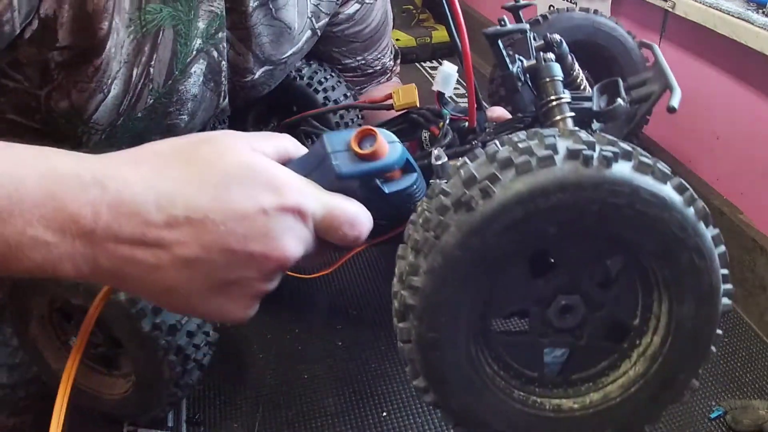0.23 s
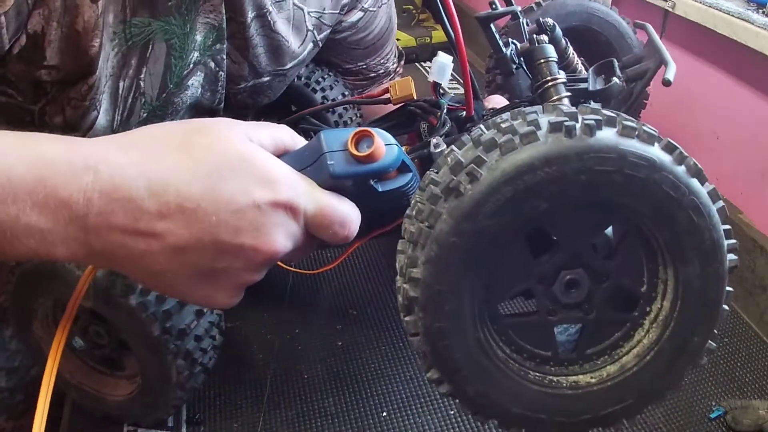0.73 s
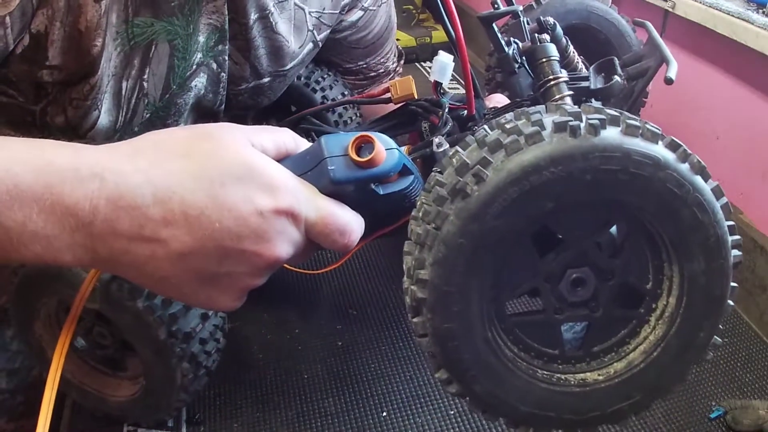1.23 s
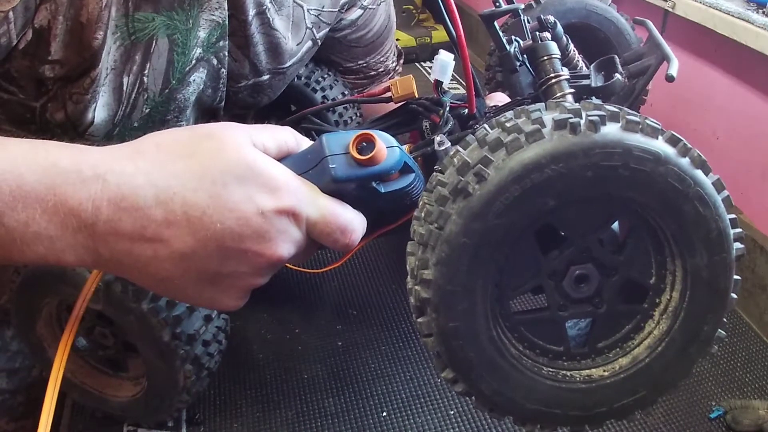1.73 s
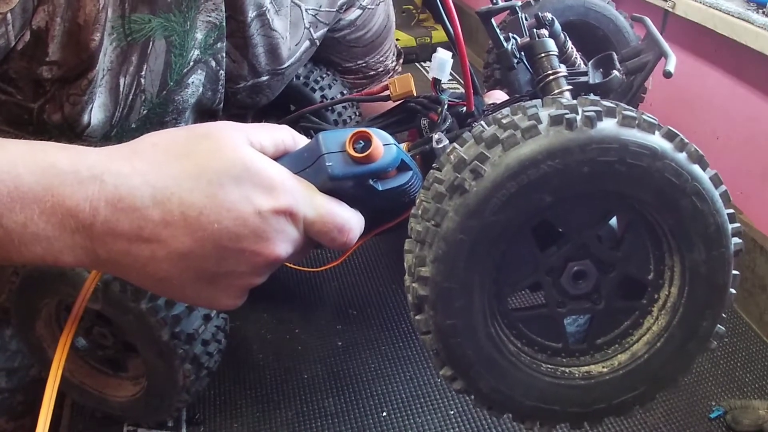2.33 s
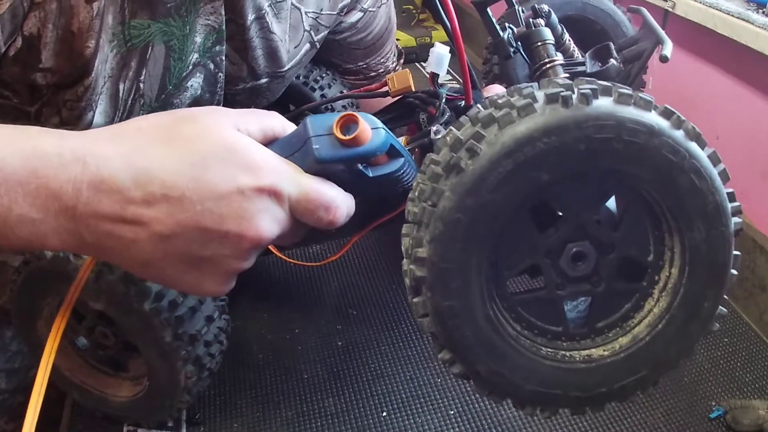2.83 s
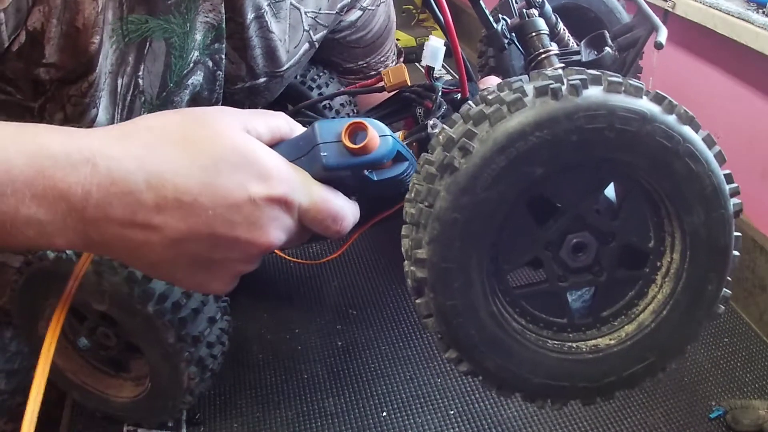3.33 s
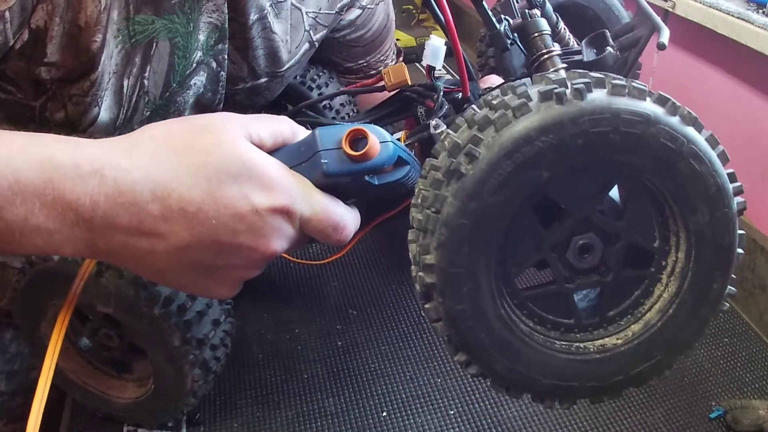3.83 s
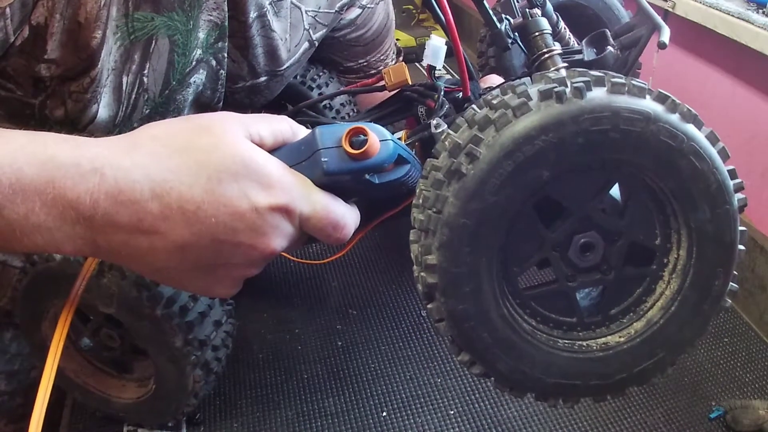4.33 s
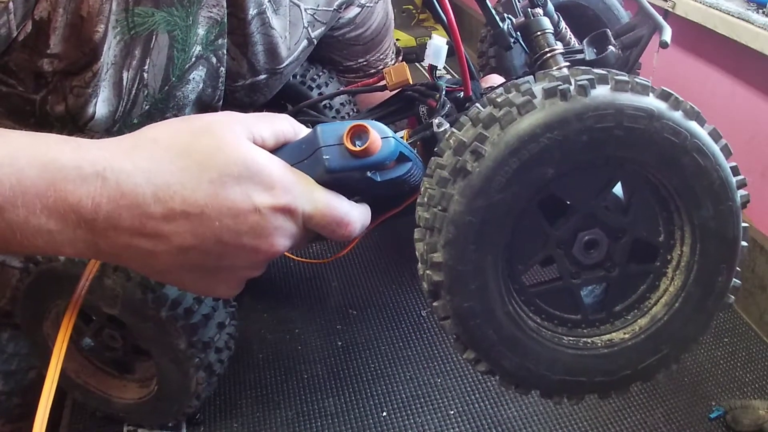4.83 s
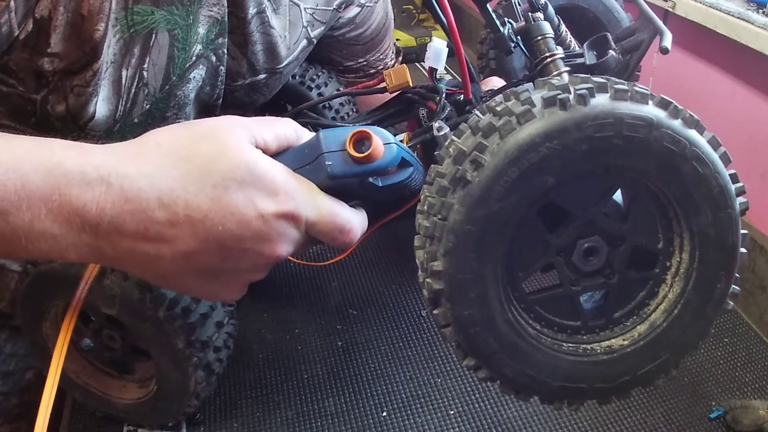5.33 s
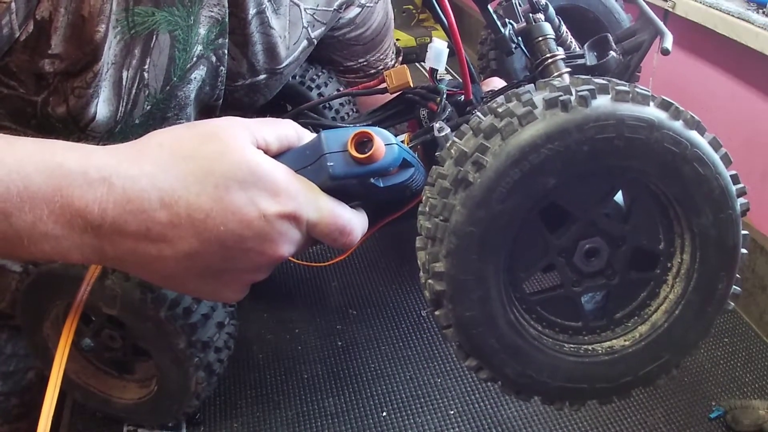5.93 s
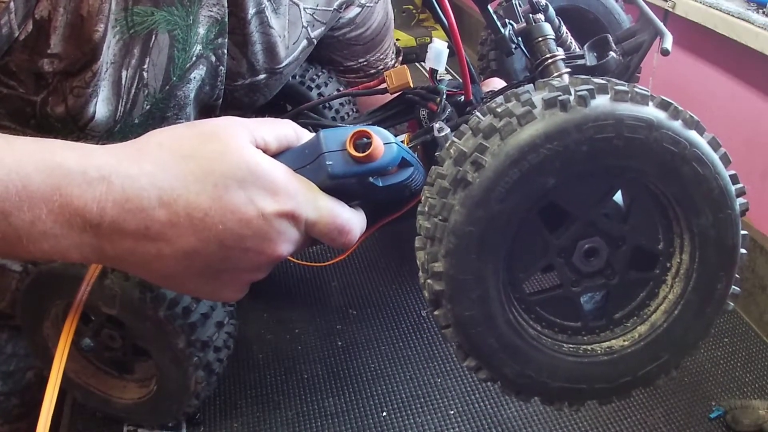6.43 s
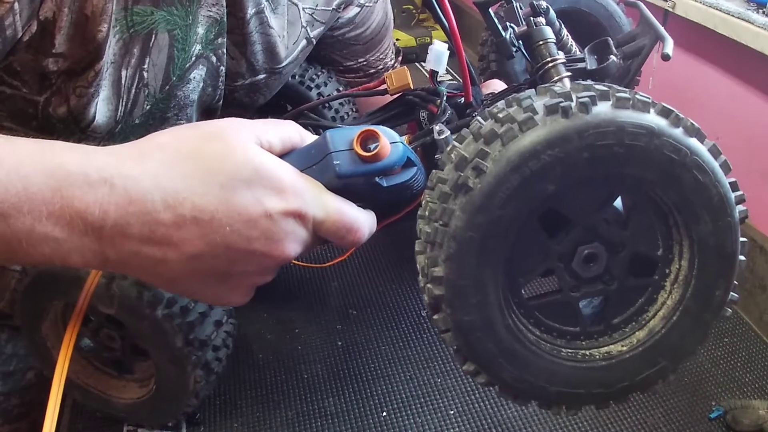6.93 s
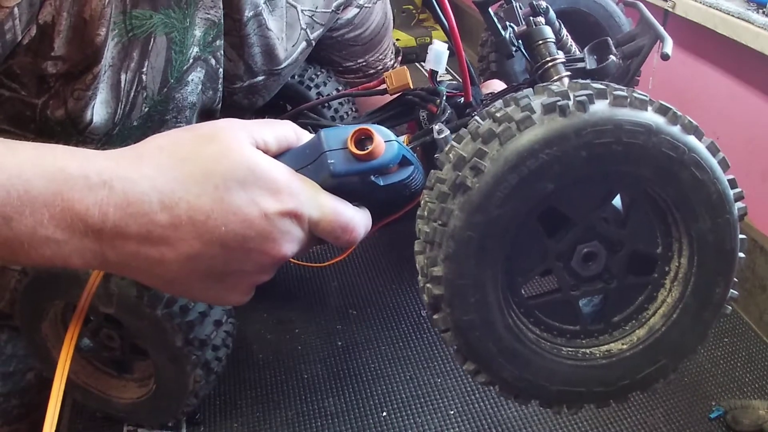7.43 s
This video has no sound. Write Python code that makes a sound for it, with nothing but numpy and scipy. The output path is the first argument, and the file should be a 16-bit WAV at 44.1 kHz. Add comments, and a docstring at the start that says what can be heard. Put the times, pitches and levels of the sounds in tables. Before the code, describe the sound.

A hot glue gun creaks through several trigger squeezes, with sharp plastic clicks, knocks and light rubbing in between.

```python
"""A hot glue gun, squeezed four times over a model car on a workbench in a small room.
The glue stick creaks through the feed in stick-slip jerks, slow and separate under the hardest push.
The sprung trigger scrapes in the hollow handle and snaps back between squeezes. Hand and gun rub,
squeak and knock on the plastic chassis; the car rocks on its tyres, and one drags over the mat."""
import sys
import numpy as np
from scipy import signal
from scipy.fft import rfft, irfft
from scipy.io import wavfile
from scipy.ndimage import uniform_filter1d, map_coordinates

SR = 44100
rng = np.random.default_rng(int(sys.argv[2]) if len(sys.argv) > 2 else 0)


def inscribe(sig):
    """Save sig as 16-bit PCM at rate SR to the path in sys.argv[1].

    A 1-D sig is mono; a 2-D sig holds one channel per row.
    Samples are clipped to [-1, 1] before scaling.
    """
    pcm = np.round(np.clip(np.atleast_2d(sig).T, -1, 1) * 32767)
    wavfile.write(sys.argv[1], SR, pcm.astype(np.int16))


N = 338247
TIME = np.arange(N) / SR
ROOM_T60_S, NEAR_T60_S = 0.23, 0.054   # room tail; scatter off the car and bench

# Cue levels in dB set how loud each creak, scrape, squeak, rub, click and thud is.
# The car rocks. Each row: start and hold in seconds, thud and rumble levels in dB.
ROCKING = [(0.0, .13, -57, -40), (0.16, 0.016, -44, -30), (0.23, 0.089, -58, -42), (0.34, 0.036, -59, -46),
           (0.48, 0.073, -69, -59), (0.697, 0.007, -48.5, -57), (0.76, 0.14, -69, -68),
           (0.97, 0.052, -68, -84), (2.79, 0.056, -67.5, -79.5), (3.342, .008, -44.5, -72),
           (3.39, 0.035, -57.5, -62), (3.49, 0.19, -65, -85), (3.9, .12, -63.5, -68),
           (4.04, 0.055, -65.5, -82), (4.845, .012, -49.5, -66), (4.9, 0.23, -59, -75),
           (5.15, 0.068, -65.5, -59), (6.858, 0.0081, -44, -84), (6.945, 0.0048, -35.5, -50),
           (7.0, 0.15, -55.5, -72), (7.17, 0.19, -65, -85)]
# Trigger clicks and gun knocks. Each row: start in seconds, then level, body, edge and handle ring in dB.
CLICKS = [(0.015, -14, -16, -9.5, -34), (0.156, -12, -6, -19.5, -10), (0.308, -23.5, -10, -30, 3.5),
          (0.69, -33, 2.5, -8, -3.5), (0.929, -23.5, -24, -31, -18), (0.974, -15.5, -35, -27.5, -12),
          (0.99, -28, 4, -25, -5), (2.378, -31.5, -26, -19, -19), (2.409, -33.5, -29, -31, -19),
          (2.785, -16.5, -15, -17.5, -10.5), (2.795, -4.5, -18.5, -11, -12.5),
          (3.292, -45.5, -13, -10, -19), (3.335, -28, 0, -15, -6), (3.447, -20.5, -23.5, -33, -19),
          (3.573, -27.5, -15, -52, -14), (3.63, -27.5, -33, -36, 0.5), (3.641, -24, -37, -33, -5),
          (3.683, -19.5, -32, -36, -17), (4.041, -26, -23, -32, -17), (4.664, -27, -40, -19, -14),
          (4.774, -17, -23, -19.5, -13), (4.785, -4, -17, -13, -14.5), (5.078, -16.5, -22, -24, -7.5),
          (5.12, -22.5, -18, -41, -10), (6.814, -15, -17.5, -20, -33), (6.83, -17, -16, 8, -9),
          (7.091, -6, -29, -18.5, -15.5), (7.095, -19.5, -15, -24, -25), (7.12, -4, -24.5, -6.5, -18)]
# Strokes over the car. Each row: start and hold in seconds, body and grain levels in dB.
RUBS = [(0.02, 0.052, -44.5, -49.5), (0.147, .008, -46.5, -47.5), (0.25, 0.11, -50.5, -57.5),
        (0.37, 0.027, -48, -59.5), (0.46, 0.14, -66.5, -71.5), (0.705, 0.093, -52, -68),
        (0.845, 0.024, -60, -55.5), (0.99, .11, -62, -74), (2.695, .005, -67.5, -76),
        (2.795, 0.0093, -55, -40.5), (3.22, 0.064, -69, -73), (3.342, 0.078, -53.5, -55),
        (3.44, 0.094, -56.5, -65.5), (3.58, 0.089, -47.5, -53.5), (3.72, 0.063, -58, -71),
        (3.9, 0.11, -52, -56), (4.044, 0.0045, -43, -59), (4.785, 0.054, -44.5, -39.5),
        (4.87, .18, -52.5, -53.5), (5.075, 0.057, -40, -44.5), (5.15, 0.068, -48, -57),
        (6.69, 0.085, -81, -70.5), (6.835, 0.014, -48, -38.5), (6.88, .13, -50, -49),
        (7.04, 0.11, -42, -49), (7.16, .09, -45, -68), (7.28, .1, -53, -66)]
# The glue stick's separate jerks. Each entry: start in seconds.
SLIP_TIMES = [ 0.1189, 0.8136, 1.5943, 1.6139, 1.6332, 1.6589, 1.6866, 1.7213, 1.7498, 1.7771, 1.8085,
              1.8411, 1.8758, 1.906, 1.934, 1.9731, 2.0102, 4.0713, 4.0855, 4.106, 4.1889, 4.2292, 4.2517,
              4.2729, 4.2902, 4.3104, 4.3346, 4.3524, 6.1526, 6.1795, 6.1984, 6.2122, 6.231, 6.2578, 6.2798,
              6.2993, 6.318, 6.338, 6.353, 6.3865, 6.417, 6.461, 6.4886, 6.5088]
# The tyre drags. Each row: start and hold in seconds, level in dB.
DRAG = [(0.158, 0.062, -26)]
# The gun squeaks on the car. Each row: start and hold in seconds, level in dB, first and last pitch in Hz.
SQUEAKS = [(0.74, 0.091, -59.5, 689, 682), (3.364, 0.07, -57, 826, 780), (3.481, 0.05, -60, 826, 820),
           (6.894, 0.0025, -42.5, 610, 625), (6.934, 0.067, -41, 641, 606), (7.047, 0.038, -51, 590, 547)]
# The trigger scrapes. Each row: start and hold in seconds, level in dB.
SCRAPES = [(0.89, 0.02, -53), (0.975, 0.025, -42), (2.795, 0.0047, -36.5), (4.783, 0.006, -39),
           (6.835, 0.011, -33.5), (7.092, 0.0051, -44)]
# Bouts of creaking. Each row: start and hold in seconds, body and edge levels in dB, slips per second.
CREAKS = [(0.975, 0.043, -39.5, -43, 106), (1.081, 0.028, -44, -54, 116), (1.234, 0.027, -48, -61, 170),
          (1.397, 0.048, -53, -65.5, 130), (1.464, 0.11, -47, -51, 76), (2.04, 0.093, -48, -42.5, 130),
          (2.152, 0.07, -47.5, -50, 117), (3.757, 0.009, -48, -57, 159), (3.864, 0.095, -46.5, -58, 183),
          (3.92, 0.024, -43, -47, 150), (4.13, 0.029, -47.5, -46.5, 62), (4.369, .06, -47.5, -37, 119),
          (4.44, 0.027, -46, -46, 142), (5.192, 0.032, -40, -44.5, 174), (5.415, 0.031, -54, -68, 170),
          (5.465, 0.074, -48, -60, 161), (5.62, 0.067, -48, -53.5, 140), (5.71, 0.19, -47, -41, 115),
          (5.925, 0.023, -47.5, -62, 110), (6.015, 0.053, -47.5, -47, 81), (6.09, 0.072, -51, -56.5, 87),
          (6.53, 0.061, -48.5, -45, 94), (7.188, 0.045, -42.5, -44, 168), (7.355, 0.085, -44.5, -45.5, 155),
          (7.449, 0.15, -44.5, -41.5, 126), (7.66, 0.019, -45.5, -54, 113)]

# Modes of the hollow handle and the chassis. Each row: pitch in Hz, level in dB, 60 dB decay in seconds.
HANDLE_MODES = [(1040, 4, 0.051), (1240, -5.5, 0.12), (1015, -19, 0.013)]
CHASSIS_MODES = [(394, -1.5, .15), (514, -9.5, 0.11), (539, -2, 0.1), (640, -15, 0.031), (720.4, 10, 0.21),
                 (1020, -10, 0.21), (1450, 11.5, 0.13)]
# Modes of the wheel. Each row: pitch in Hz, bandwidth in Hz, relative peak height in dB.
WHEEL_MODES = [(498, 17, -4.5), (700, 11, -20), (900, 17, -26), (1080, 18, -13), (1430, 39, 6),
               (1660, 90, -5.5), (1840, 10, -4), (2180, 15, -13)]

# EQ curves of the layers. Each row: frequency in Hz, relative spectral density in dB.
THUD_EQ = [(30, -53), (80, -28.5), (130, -8), (165, 0.5), (210, -3.5), (270, -11.5), (350, -6),
           (500, -45.5), (1000, -74)]
RUMBLE_EQ = [(8, -11.5), (28, 5.5), (52, -1.5), (80, -14.5), (140, -27.5), (400, -81)]
AIR_EQ = [(12, -35), (20, -6.5), (41, -6.5), (119, -18), (161, -2), (207, -6.5), (232, -5.5), (289, -13.5),
          (478, -8.5), (534, -22.5), (767, -7), (1300, -14.5), (4950, -21), (10000, -29), (12500, -40.5),
          (15500, -52.5)]
CLICK_EQ = [(120, -56), (200, -29), (339, -29), (488, -2), (798, -13.5), (1010, 0), (1150, -9), (2210, -2),
            (2470, -1.5), (4100, -2), (4660, -6.5), (6470, -13.5), (6960, -15.5), (8980, -9.5),
            (15500, -47.5)]
RUB_EQ = [(150, -43.5), (250, -20), (411, -18), (496, 8), (560, 6.5), (700, -8.5), (968, -5.5), (1560, -7),
          (1860, -3.5), (2200, -2.5), (2660, -1), (2950, 1), (4680, -12.5), (7430, -26.5), (8670, -23),
          (15000, -59.5)]
SHELL_EQ = [(300, -56), (850, -16.5), (1230, -27), (1600, -74.5), (1980, -3), (2650, -6), (3200, 5.5),
            (3900, 2), (4850, -2.5), (5700, -9.5), (7900, -25.5), (10000, -18.5), (11000, -41),
            (15000, -43)]   # the gun's shell as a jerk rings it
SLIP_EQ = [(240, -87), (400, -51), (465, -40.5), (723, -35.5), (994, -17), (1230, -12.5), (1370, -20.5),
           (2090, -10.5), (2290, -19), (3150, 0), (4810, -15), (6510, -22), (8180, -17), (11100, -41),
           (15000, -59.5)]
DRAG_EQ = [(150, -49.5), (250, -10.5), (411, -19), (505, -9.5), (620, -22.5), (1130, -19), (1410, 1.5),
           (1480, -6.5), (2200, -16), (2530, -24), (3000, -20), (5550, -28.5), (7060, -32.5), (8100, -26),
           (15000, -57)]
SQUEAK_EQ = [(700, -7), (1000, -95), (1350, 36.5), (1900, 35), (2600, 31.5), (3300, -70), (4500, -4),
             (5300, -22), (8500, 8), (13000, -10)]
CREAK_EQ = [(290, -54), (500, -22.5), (674, -19.5), (734, -30.5), (976, -10.5), (1320, -6), (1580, -15),
            (2130, 1.5), (2350, -4), (3050, 3.5), (3940, -8.5), (4870, -6.5), (5620, -23), (8610, -19),
            (15000, -67.5)]


def from_db(db):
    """Decibels to gain."""
    return 10 ** (np.asarray(db) / 20)


def rms_one(x):
    """Scale to rms 1."""
    return x / np.sqrt(np.mean(x ** 2) + 1e-20)


def energy_one(x):
    """Scale to energy 1."""
    return x / np.sqrt(np.sum(x ** 2) + 1e-20)


def cut(x, hz, kind):
    """Butterworth low-, high- or band-pass."""
    return signal.sosfilt(signal.butter(4, hz, kind, fs=SR, output="sos"), x)


def through(x, response):
    """Pass a sound through an impulse response."""
    return signal.oaconvolve(x, response)[:len(x)]


def eq(x, curve, size=4096):
    """Minimum-phase EQ with unit power gain."""
    hz, db = np.transpose(curve)
    grid = np.log(np.fft.rfftfreq(size, 1 / SR) + 1)
    cepstrum = irfft(np.log(from_db(np.interp(grid, np.log(hz), db))))
    cepstrum[1:size // 2] *= 2
    response = irfft(np.exp(rfft(cepstrum[:size // 2], size)))
    return through(x, energy_one(response))


def dying_noise(t60):
    """Noise that dies away; energy 1."""
    t = TIME[:SR // 2]
    return energy_one(rng.standard_normal(len(t)) * from_db(-60 * t / t60))


def ringing(modes):
    """Response of a set of modes to one click; energy 1."""
    t = TIME[:SR // 2]
    partials = (from_db(db - 60 * t / t60) * np.sin(2 * np.pi * hz * t) for hz, db, t60 in modes)
    return energy_one(sum(partials))


def echoes(near_db, room_db):
    """A short pre-delay, quick scatter off the car and bench, and the duller tail of the room."""
    near = from_db(near_db) * dying_noise(NEAR_T60_S)
    room = from_db(room_db) * cut(dying_noise(ROOM_T60_S), 8400, "low")
    return np.concatenate([np.zeros(SR // 700), near + room])


def even(x, size=1300):
    """Ride the level steady over size samples, keeping the grain."""
    return x / np.sqrt(np.abs(uniform_filter1d(x ** 2, size)) + 1e-3 * np.mean(x ** 2))


def friction(per_s, spread_db):
    """Tiny catches of uneven strength at random moments."""
    sizes = from_db(spread_db * np.minimum(rng.exponential(1, N), 4)) * rng.standard_normal(N)
    return rms_one(sizes * (rng.random(N) < per_s / SR))


def swells(cues, attack_s, release_s):
    """One envelope per level column; attack (before the start) and release span 60 dB."""
    t = TIME[::32]
    levels = []
    for start, hold, *db in cues:
        fade = np.maximum(start - t, 0) / attack_s + np.maximum(t - start - hold, 0) / release_s
        levels.append(np.array(db)[:, None] - 60 * fade)
    loudest = np.maximum(np.max(levels, axis=0), -200)
    return [np.interp(TIME, t, gain) for gain in from_db(loudest)]


def car_rocking(thud_db=-1.0, rumble_db=-7.0):
    """Soft thuds and rumble as the car shifts on its tyres under the hand."""
    thud_env, rumble_env = swells(ROCKING, attack_s=0.09, release_s=0.24)
    thud = even(eq(rng.standard_normal(N), THUD_EQ), size=2000)
    rumble = even(eq(rng.standard_normal(N), RUMBLE_EQ), size=4000)
    return from_db(thud_db) * thud_env * thud + from_db(rumble_db) * rumble_env * rumble


def room_air(level_db=-71.5):
    """A faint, steady bed of room tone."""
    return from_db(level_db) * eq(rng.standard_normal(N), AIR_EQ)


def clack(rattle_s=0.032, rise_s=0.0035, near_db=-18.0, room_db=-16.5):
    """A burst of tiny contacts that dies first into the scatter, then into the room."""
    t = TIME[:SR // 4]
    stages = [(0, rattle_s), (near_db, NEAR_T60_S), (room_db, ROOM_T60_S)]
    decay = sum(from_db(db - 60 * t / t60) for db, t60 in stages)
    attack = np.minimum(t / rise_s, 1) ** 2
    return eq(rng.standard_normal(len(t)) * decay * attack, CLICK_EQ)


def gun_clicks(level_db=11.0, body_db=13.0, edge_db=10.0, chassis_db=-20.5):
    """The trigger snaps and the gun knocks; each clack rings the handle and the chassis."""
    track, handle = np.zeros(N + SR), ringing(HANDLE_MODES)
    for start, hit_db, low_db, high_db, ring_db in CLICKS:
        burst = clack()
        body = from_db(low_db + body_db) * energy_one(cut(burst, 1600, "low"))
        mids = energy_one(cut(burst, [1600, 6000], "band"))
        edge = from_db(high_db + edge_db) * energy_one(cut(burst, 6000, "high"))
        hit = energy_one(body + mids + edge) + from_db(ring_db) * handle[:len(burst)]
        track[int(start * SR):][:len(hit)] += from_db(hit_db + level_db) * hit
    track = track[:N]
    chassis = from_db(chassis_db) * through(track, ringing(CHASSIS_MODES))
    return cut(track + chassis, 150, "high")


def chassis_rubbing(ring_db=-16.5, body_db=-2.0, hiss_db=-7.0):
    """Skin and plastic slide on the chassis: fine catches that hum in its modes."""
    catches = friction(per_s=2200, spread_db=3.0)
    rub = eq(catches + through(catches, echoes(near_db=0.0, room_db=-4.5)), RUB_EQ)
    ring = from_db(ring_db) * through(catches, ringing(CHASSIS_MODES))
    body = from_db(body_db) * even(rms_one(cut(rub, 1516, "low")) + ring)
    grain = even(cut(rub, [1600, 5000], "band"))
    hiss = from_db(hiss_db) * even(cut(rub, 5600, "high"))
    body_env, grain_env = swells(RUBS, attack_s=0.16, release_s=0.25)
    return body_env * body + grain_env * (grain + hiss)


def glue_slips(jerk_db=-15.0, doubled_wait_db=4, scatter_db=-4.0, grit_db=-5.5):
    """The longer the glue stick has stuck, the harder it jerks and rings the gun's shell."""
    usual_wait_s, full_strain_s, relax_s = 0.016, 0.036, 0.1
    waits = np.diff(SLIP_TIMES, prepend=0)
    # The strain tops out, and relaxes over a long pause.
    waits = np.where(waits < relax_s, np.minimum(waits, full_strain_s), usual_wait_s)
    strengths = from_db(jerk_db + doubled_wait_db * np.log2(waits / usual_wait_s))
    jerks = np.zeros(N)
    jerks[(np.array(SLIP_TIMES) * SR).astype(int)] = strengths
    grit = from_db(grit_db) * through(jerks, energy_one(np.hanning(SR // 300))) * rng.standard_normal(N)
    scatter = from_db(scatter_db) * through(jerks, echoes(near_db=2.5, room_db=0))
    return eq(jerks, SHELL_EQ) + eq(scatter + grit, SLIP_EQ)


def tyre_drag(level_db=0.5, ring_db=-6.0):
    """Rubber judders over the mat and leaves the wheel ringing."""
    envelope, = swells(DRAG, attack_s=0.025, release_s=0.14)
    catches = even(friction(per_s=1200, spread_db=2.5), size=500) * envelope
    # A wider mode starts louder and dies sooner.
    wheel = ringing([(hz, db + 20 * np.log10(width), np.log(1000) / (np.pi * width))
                     for hz, width, db in WHEEL_MODES])
    judder = cut(eq(catches, DRAG_EQ), 380, "high") + from_db(ring_db) * through(catches, wheel)
    return from_db(level_db) * (judder + through(judder, echoes(near_db=1.5, room_db=-10)))


def rubbery_squeaks(waver=0.034):
    """The gun slides on the car: very fast stick-slip with a gliding, wavering pitch."""
    glide = [point for start, hold, _, first_hz, last_hz in SQUEAKS
             for point in ((start, first_hz), (start + hold, last_hz))]
    wobble = waver * rms_one(cut(rng.standard_normal(N), 120, "low"))
    pitch = np.interp(TIME, *np.transpose(glide)) * (1 + wobble)
    catches = np.diff(np.floor(np.cumsum(pitch) / SR), prepend=0)   # one per cycle
    pressure, = swells([row[:3] for row in SQUEAKS], attack_s=0.023, release_s=0.1)
    squeak = eq(rms_one(catches) * pressure, SQUEAK_EQ)
    return cut(squeak + through(squeak, echoes(near_db=-8, room_db=-4.5)), 500, "high")


def trigger_scrapes(decay_scale=0.49):
    """The trigger scrapes ever harder until it lets go, humming in the hollow handle."""
    catches = friction(per_s=1200, spread_db=5.0)
    handle = ringing([(hz, db, decay_scale * t60) for hz, db, t60 in HANDLE_MODES])
    hum = cut(through(catches, handle), 700, "high")
    envelope, = swells(SCRAPES, attack_s=0.15, release_s=0.04)
    return envelope * even(hum, size=700)


def regrip(x, spread=0.018):
    """The changing grip shifts all resonances a little, by a new amount for each bout of creaking."""
    shift = np.interp(TIME, [row[0] for row in CREAKS], spread * rng.standard_normal(len(CREAKS)))
    return map_coordinates(x, [np.cumsum(1 + shift)], order=3, mode="mirror")


def glue_creak(jitter=0.22, uneven_db=2.5, shell_db=2.0):
    """The stick catches and lets go at an unsteady pace: each release ticks in the shell and skids."""
    pace_points = [(start + hold / 2, per_s) for start, hold, _, _, per_s in CREAKS]
    pace = np.interp(TIME, *np.transpose(pace_points))
    timing, strength = rng.standard_normal((2000, 2)).T
    onsets = np.searchsorted(np.cumsum(pace) / SR, np.cumsum(np.exp(jitter * timing)))
    jerks = np.zeros(N)
    jerks[onsets[onsets < N]] = from_db(uneven_db * strength[onsets < N])
    skids = rms_one(through(jerks, np.hanning(SR // 250)) * rng.standard_normal(N))
    scatter = through(rms_one(jerks), echoes(near_db=11, room_db=4.5))
    ticks = from_db(shell_db) * rms_one(eq(jerks, SHELL_EQ))
    creak = regrip(eq(skids + scatter, CREAK_EQ) + ticks)
    body_env, edge_env = swells([row[:4] for row in CREAKS], attack_s=0.17, release_s=0.19)
    return body_env * even(cut(creak, 2930, "low")) + edge_env * even(cut(creak, 3750, "high"))


def scene():
    """Gun and car sit close and dead centre, over the room tone."""
    air = room_air()
    gun = glue_slips() + glue_creak() + trigger_scrapes() + gun_clicks()
    car = chassis_rubbing() + rubbery_squeaks() + tyre_drag() + car_rocking()
    return np.array([gun + car + air] * 2)


def record(dry):
    """A steep high cut at 15.6 kHz on the whole mix."""
    return signal.sosfilt(signal.ellip(10, 0.1, 80, 15600, fs=SR, output="sos"), dry)


dry = scene()
out = record(dry)
inscribe(out)
```